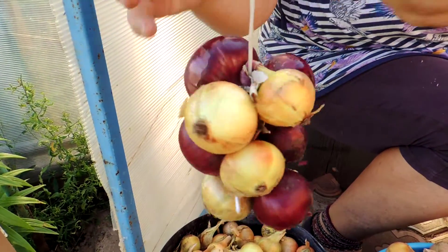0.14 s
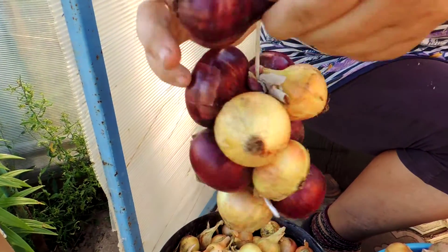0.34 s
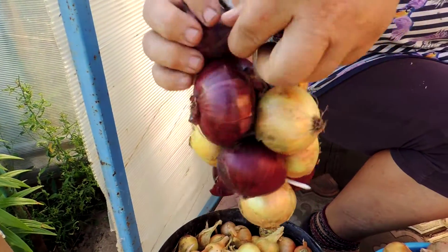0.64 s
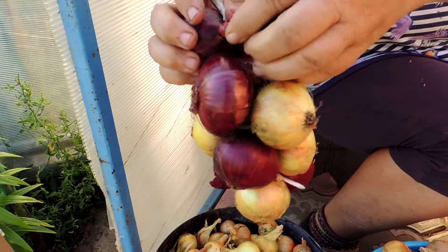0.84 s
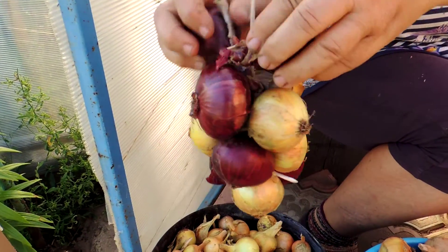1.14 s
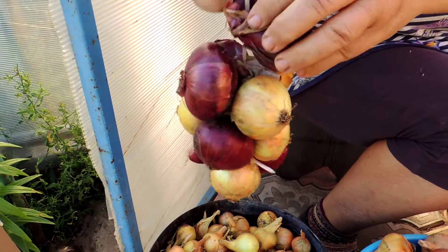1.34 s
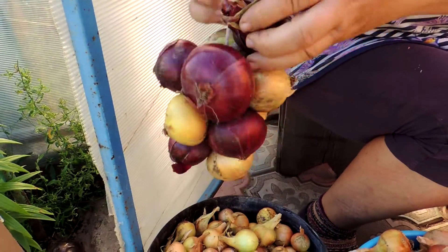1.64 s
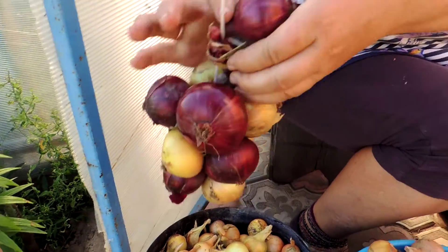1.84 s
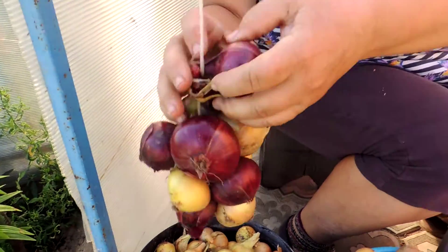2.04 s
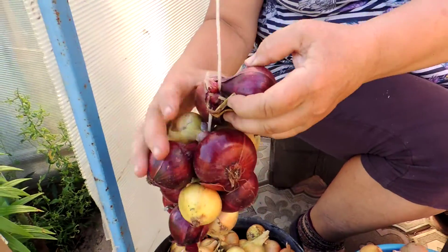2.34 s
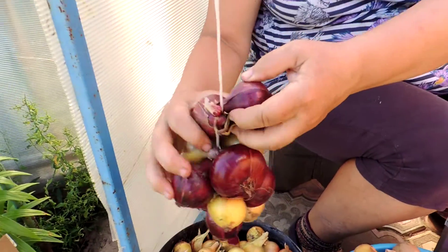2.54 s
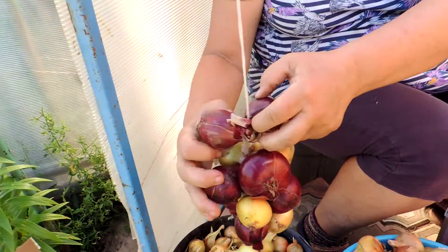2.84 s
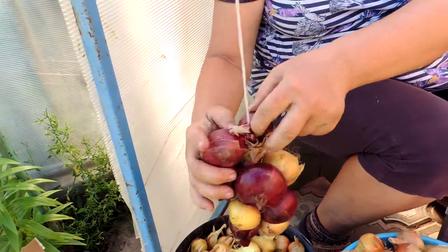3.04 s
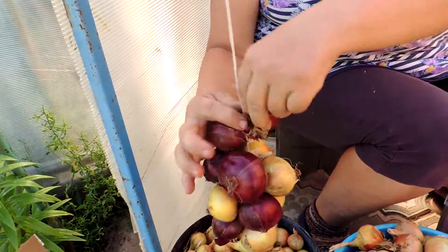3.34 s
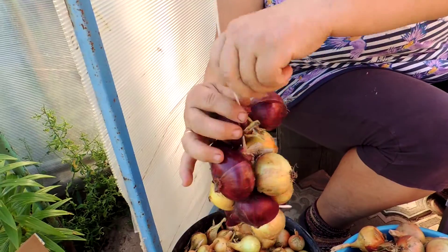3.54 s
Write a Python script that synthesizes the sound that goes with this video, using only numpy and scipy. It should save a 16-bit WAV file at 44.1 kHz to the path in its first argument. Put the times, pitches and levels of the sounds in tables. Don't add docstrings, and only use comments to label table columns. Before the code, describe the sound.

Dry onion husks crackle close up, slightly left. At first mostly a low distant engine drone and light wind buffeting, with faint ticks; from 0.6 s brittle rubbing strokes and bright snaps begin. Wind thumps strongest near 1 s, gone by 1.9. Soft knocks fall between 1 and 2.4 s. Crackling is densest around 1.9-2.3 and 2.7-3.1 s, as the engine fades into steady far traffic and faint hiss.

```python
import sys
import numpy as np
from scipy import signal
from scipy.fft import rfft, irfft, next_fast_len
from scipy.io import wavfile
from scipy.ndimage import uniform_filter1d, map_coordinates

SR = 44100
rng = np.random.default_rng(int(sys.argv[2]) if len(sys.argv) > 2 else 0)


def how_loud(loudness_db):
    steps = np.asarray(loudness_db, float) / 20
    return 10 ** steps


def wrap_up_sound(samples):
    columns = np.atleast_2d(samples).T
    tamed = np.clip(columns, -1, 1)
    steps = np.round(tamed * 32767).astype(np.int16)
    wavfile.write(sys.argv[1], SR, steps)


N = 163170

CRACK_HZ = 13270
TAIL_S = .005


def unit(x):
    return x / np.sqrt(np.mean(x ** 2) + 1e-20)


def curves(rows):
    s, *columns = np.transpose(rows)
    return [np.interp(np.arange(N) / SR, s, column) for column in columns]


def wobble(rate):
    points = rng.standard_normal(int(N * rate / SR) + 4)
    return map_coordinates(points, [np.arange(N) * rate / SR])


def colour(x, gain):
    m = next_fast_len(x.shape[-1] + 512)
    hz = np.fft.rfftfreq(m, 1 / SR) + 1
    return irfft(rfft(x, m) * gain(hz), m)[..., :x.shape[-1]]


def along(spectrum):
    f, db = np.transpose(spectrum)
    return lambda hz: how_loud(np.interp(np.log(hz), np.log(f), db, left=-120))


def hump(centre_hz, octaves):
    return lambda hz: np.exp(-(np.log2(hz / centre_hz) / octaves) ** 2 / 4)


def pair(alike, size):
    a, b = rng.standard_normal((2, size))
    angle = np.arccos(np.clip(alike, -1, 1)) / 2
    shared, own = np.cos(angle) * a, np.sin(angle) * b
    return np.array([shared + own, shared - own])


def noise(spectrum, alike):
    end = (0.9 * spectrum[-1][0], -120)
    return unit(colour(pair(alike, N), along([*spectrum, end])))


# (time [s], level [dB])
PASSING = [(0, -55.5), (1.1, -52.5), (1.6, -54.5), (2.06, -53.5), (3.7, -55.5)]
# (frequency [Hz], level [dB per Hz])
TRAFFIC = [(94, -2), (160, -3), (236, -4), (567, -5), (734, -4.5), (835, -4), (1450, -8.5), (2260, -16.5),
           (3500, -22), (4550, -30), (7700, -120)]
# (frequency [Hz], level [dB per Hz])
RUMBLE = [(12, 4), (45, 3.5), (200, -16)]
# (frequency [Hz], level [dB per Hz])
HISS = [(900, -7), (2000, 3.5), (5000, 2), (14300, -7)]


def background():
    traffic_db = 3 + curves(PASSING)[0] + 0.68 * wobble(7.6)
    traffic = how_loud(traffic_db) * noise(TRAFFIC, alike=0.62)
    rumble = how_loud(-53) * noise(RUMBLE, alike=1.0)
    hiss = how_loud(-56) * noise(HISS, alike=0.043)
    return traffic + rumble + hiss


# (time [s], level [dB])
WIND = [(0, -46.5), (.1, -42), (.3, -55), (.42, -44.5), (.6, -55), (.75, -43), (.94, -62), (1.01, -32),
        (1.11, -35), (1.2, -46), (1.42, -39), (1.65, -45.5), (1.85, -66), (3.1, -65)]
# (frequency [Hz], level [dB per Hz])
BUFFET = [(15, 14.5), (35, 4), (110, 5), (200, -12.5), (400, -53)]


def wind():
    lumps = how_loud(3 * np.array([wobble(20), wobble(20)]))
    side_db = np.array([[-2.2], [2.2]])
    return how_loud(curves(WIND)[0] + side_db) * unit(lumps * noise(BUFFET, alike=0.068))


# (time [s], level [dB])
ENGINE = [(0, -38), (.36, -37.5), (.45, -34.5), (1.5, -39.5), (1.62, -44), (1.8, -40.5), (2.2, -45.5),
          (2.35, -45), (2.85, -47), (3, -51), (3.7, -54.5)]
# (time [s], firing rate [Hz])
FIRING = [(1.6, 69.7), (2.4, 70.55)]


def engine():
    (hz,), (db,) = curves(FIRING), curves(ENGINE)
    phase = 2 * np.pi * np.cumsum(hz + 0.3 * wobble(7.65)) / SR
    tone = how_loud(1.25 * wobble(10.2)) * np.sin(phase)
    octave = how_loud(-14 + 1.15 * wobble(7.74)) * np.sin(2 * phase + 1)
    return np.sqrt(2) * how_loud(db) * (tone + octave)


# (time [s], peak level [dB], width [ms], left over right [dB])
KNOCKS = [
    (.9903, -25, .28, 0),
    (1.099, -31, 2.4, -9),
    (1.447, -31, 2.9, -12),
    (1.8484, -24, .14, -5),
    (2.428, -31, .2, 0),
]


def knocks():
    t_ms, out = np.arange(N) / SR * 1000, np.zeros((2, N))
    for s, db, ms, pan_db in KNOCKS:
        u = np.clip((t_ms - s * 1000) / ms, 0, 60)
        dip = -4 * u * (1 - u / 3) * np.exp(-u)
        out += how_loud(db + pan_db * np.array([[.5], [-.5]])) * dip
    return out


def burst(t, echo_s):
    crack_s, rise_s = .0003, .00018

    def fall(s, life):
        return np.exp(-2 * np.abs(s) / np.where(s < 0, rise_s, life))

    echo = how_loud(2 * -9) * fall(t - echo_s, crack_s)
    tail = how_loud(2 * -19) * fall(t, TAIL_S)
    return np.sqrt(fall(t, crack_s) + echo + tail)


# (time [s], bright crack [dB], dull flake [dB], flake pitch [Hz])
SNAPS = [(0.1509, -45, -48, 5500), (0.2406, -49, -44, 4700), (0.4043, -37, -53, 5700),
         (0.5155, -39, -41, 6700), (0.5605, -38, -50, 5800), (0.6199, -42, -35, 7700),
         (0.6582, -33, -42, 6500), (0.6944, -26, -31, 8100), (0.6965, -29, -29, 6000),
         (0.7157, -29, -53, 7500), (0.7645, -32, -39, 7100), (0.8505, -28, -34, 5900),
         (0.8939, -31, -38, 8600), (0.94, -25, -52, 6500), (0.9872, -24, -37, 5300),
         (1.0427, -32, -45, 5500), (1.0474, -34, -48, 5800), (1.0819, -26, -34, 4500),
         (1.1823, -31, -43, 4000), (1.2678, -31, -45, 6600), (1.3256, -23, -33, 5700),
         (1.3335, -20, -25, 6800), (1.3521, -28, -36, 7000), (1.3635, -29, -44, 7100),
         (1.388, -31, -42, 8500), (1.3994, -33, -44, 5500), (1.4306, -28, -36, 3800),
         (1.6229, -25, -29, 5400), (1.662, -34, -42, 5500), (1.668, -34, -45, 5200),
         (1.6876, -34, -39, 7300), (1.7317, -37, -42, 8400), (1.7523, -35, -35, 8300),
         (1.7545, -34, -39, 6900), (1.7739, -26, -27, 4100), (1.7919, -32, -39, 6600),
         (1.7967, -33, -39, 6000), (1.8221, -32, -37, 8100), (1.8241, -34, -40, 6200),
         (1.8415, -27, -35, 5300), (1.887, -29, -32, 7000), (1.9138, -39, -33, 4200),
         (1.935, -33, -35, 6800), (1.9498, -25, -32, 8000), (1.9784, -17, -24, 5000),
         (1.9884, -28, -43, 7900),
         (1.9924, -30, -52, 7700), (2.0148, -26, -41, 6900), (2.0395, -31, -40, 7000),
              (2.1233, -19, -28, 8800), (2.1516, -25, -41, 6100), (2.163, -27, -35, 6600),
              (2.2011, -28, -36, 6600), (2.2059, -26, -34, 6800), (2.2185, -22, -35, 8000),
              (2.2217, -18, -34, 6300), (2.2295, -20, -26, 6600), (2.2313, -32, -33, 6000),
              (2.2502, -34, -40, 7000), (2.319, -39, -45, 5600), (2.3589, -35, -45, 7100),
              (2.5594, -25, -32, 8000), (2.5912, -34, -33, 7300), (2.5965, -32, -42, 6600),
              (2.7348, -22, -25, 6700), (2.7542, -33, -41, 7600), (2.7627, -16, -33, 6500),
              (2.8078, -32, -39, 7800), (2.8809, -35, -46, 6700), (2.9099, -25, -34, 7500),
              (2.9207, -20, -29, 5800), (2.9332, -29, -41, 7700), (2.9497, -30, -39, 7300),
              (2.9687, -29, -44, 6600), (2.9751, -23, -30, 6900), (3.0017, -27, -22, 7400),
              (3.0037, -26, -25, 7300), (3.0286, -23, -30, 6300), (3.0595, -21, -22, 6900),
              (3.1012, -28, -27, 7500), (3.1034, -31, -32, 6100), (3.2804, -31, -48, 8400),
              (3.2994, -33, -36, 8200), (3.3332, -29, -41, 5500), (3.3448, -34, -37, 7400),
              (3.36, -28, -40, 7800), (3.3681, -29, -39, 6200), (3.384, -28, -39, 7000),
              (3.3871, -34, -42, 8000), (3.4666, -26, -37, 7600), (3.4692, -31, -39, 7900),
              (3.5001, -32, -45, 7400), (3.6594, -33, -37, 7500), (3.6615, -39, -41, 8200),
         (.455, -48, -50, 5500),
    (.6815, -40, -38, 2100),
    (.835, -38, -50, 8000),
    (2.3767, -40, -46, 6000),
    (2.456, -53, -40.5, 3670),
]


def snaps():
    out, lead = np.zeros((2, N + SR)), 128
    t = (np.arange(1024) - lead) / SR
    for s, crack_db, flake_db, flake_hz in SNAPS:
        pitch_shift, echo_shift = rng.standard_normal(size=2)
        echo_s = .0016 * how_loud(2 * echo_shift)
        blow = burst(t, echo_s) * np.sign(pair(0.7, len(t)))
        crack_gain = hump(CRACK_HZ * how_loud(pitch_shift / 3), .22)
        start = round(s * SR) - lead - 4
        for db, gain in (crack_db, crack_gain), (flake_db, hump(flake_hz, .36)):
            part = colour(blow, gain)
            peak = np.std(part[:, lead - 8:lead + 19])
            out[:, start:][:, :len(t)] += how_loud(db + 2) * part / peak
    return out[:, :N]


# (pitch [Hz], width [octaves])
FLAKES = [(2500, 0.34), (4500, 0.33), (7000, 0.47), (10000, 0.36), (13000, 0.21)]
# (frequency [Hz], level [dB per Hz])
HUSK = [(710, -42), (1200, 2), (2250, -12), (2770, -8), (7360, -5.5), (9140, -5), (13000, -2), (14100, 0)]


def crackle():
    grains_per_s, spread_db, grain_s = 1100, 4, 0.00021
    chance, size = rng.random((2, N))
    struck = chance < grains_per_s / SR * how_loud(5 * wobble(45))
    hits = struck * how_loud(-2 * spread_db * np.log(np.maximum(size, .08)))
    t, out = np.arange(SR // 100) / SR, 0
    shape = np.exp(-2 * t / grain_s) + 0.033 * np.exp(-2 * t / TAIL_S)
    for hz, octaves in FLAKES:
        own_hits = hits * how_loud(2 * 7.5 * np.clip(rng.standard_normal(N), -3, 1.3))
        power = signal.fftconvolve(own_hits, shape)[:N]
        grains = unit(np.sqrt(np.abs(power)))
        loudness = np.hypot(grains, how_loud(-7)) * how_loud(1.2 * wobble(30.09))
        alike = 0.33 + 0.23 * np.log2(CRACK_HZ / hz)
        out = out + colour(loudness * pair(alike, N), hump(hz, octaves))
    return unit(colour(out, along(HUSK)))


# (time [s], level [dB])
HANDLING = [(0, -59), (.53, -56.5), (.6, -43), (1.04, -43.5), (1.1, -53), (1.24, -53), (1.5, -41),
            (1.56, -66), (1.65, -45), (2.2, -48), (2.32, -50), (2.6, -44.5), (2.85, -48), (2.95, -46.5),
            (3.5, -40.5), (3.56, -52.5), (3.7, -45.5)]
# (peak time [s], swell [s], fade [s], level [dB], dull part [dB])
RUBS = [(.409, .009, 0.009, -42.5, -2), (.647, 0.041, .007, -43, -2), (.702, .015, .021, -31.5, 0),
        (.778, 0.0069, 0.02, -31, -3), (.856, 0.0071, .011, -39, 3), (.942, 0.021, .024, -34.5, -11),
        (1.004, 0.011, 0.019, -42, 4), (1.179, 0.0065, 0.0094, -42.5, 3), (1.326, 0.046, .011, -30, 0.5),
        (1.45, 0.023, 0.046, -34.5, -0.5), (1.624, 0.011, 0.025, -37.5, -0.5), (1.8, .028, 0.021, -34, -1),
        (1.89, 0.0066, 0.0055, -32, -2.5), (1.989, 0.0091, .0075, -34.5, 0),
        (2.047, 0.011, 0.018, -33.5, 0), (2.124, 0.013, 0.013, -31, 0), (2.166, 0.0069, 0.0093, -31, 1),
        (2.215, 0.0053, 0.0052, -28, 4.5), (2.594, 0.022, .004, -37, -2.5),
        (2.699, 0.018, 0.019, -28.5, -0.5), (2.977, .007, 0.007, -27.5, -7.5),
        (3.006, 0.0033, 0.011, -26, -1), (3.101, 0.023, .009, -33.5, -3.5),
        (3.145, .005, 0.0098, -36.5, -2.5), (3.188, 0.0049, 0.0086, -34, 0.5),
        (3.328, 0.037, 0.0071, -36, -2.5), (3.476, 0.013, 0.018, -37, -4), (3.67, 0.0074, .014, -53, -11)]


def rubbing():
    t = np.arange(N) / SR
    bright = dull = how_loud(2 * curves(HANDLING)[0])
    for s, swell, fade, db, dull_db in RUBS:
        distance = np.abs(t - s) / np.where(t < s, swell, fade)
        stroke = how_loud(2 * db) * np.exp(-.7 * distance ** 1.27)
        bright = bright + stroke
        dull = dull + how_loud(2 * dull_db) * stroke
    sound = crackle()
    low = colour(sound, lambda hz: 1 / (1 + (hz / 6000) ** 4))
    return np.sqrt(bright) * (sound - low) + np.sqrt(dull) * low


def scene():
    husks = (rubbing() + snaps()) * how_loud([[.3], [-.3]])
    return background() + wind() + engine() + knocks() + husks


def top_cut(x):
    return signal.sosfilt(signal.butter(12, 16000, fs=SR, output="sos"), x)


def record(dry):
    edge_hz, opens_db, above_db = 14270, -24, -27
    top = colour(dry, lambda hz: hz > edge_hz)
    smooth = uniform_filter1d(uniform_filter1d(top ** 2, size=40), size=40)
    loudness = np.abs(smooth).mean(axis=0)
    gate = np.minimum(loudness / how_loud(2 * opens_db), 1)
    mix = dry - top + how_loud(above_db) * gate * top
    return top_cut(mix)


dry = scene()
out = record(dry)
wrap_up_sound(out)
```